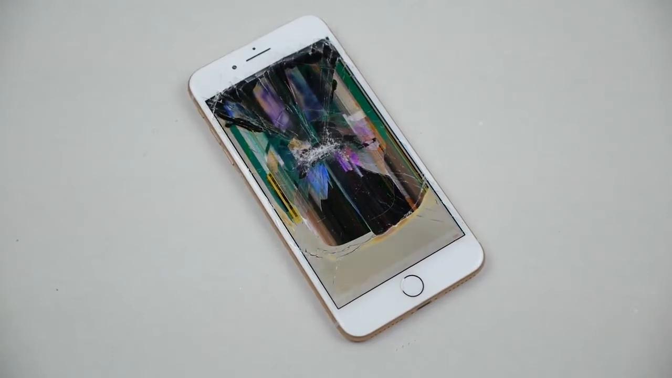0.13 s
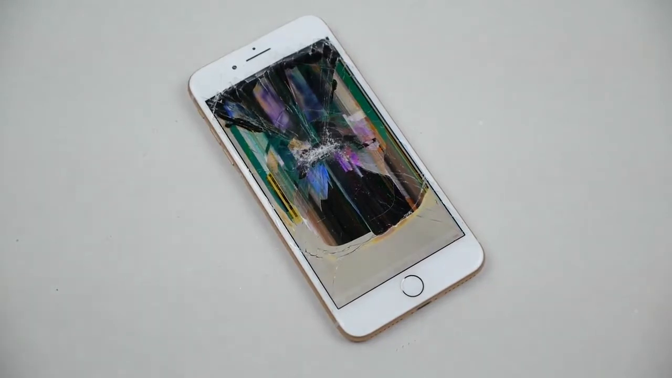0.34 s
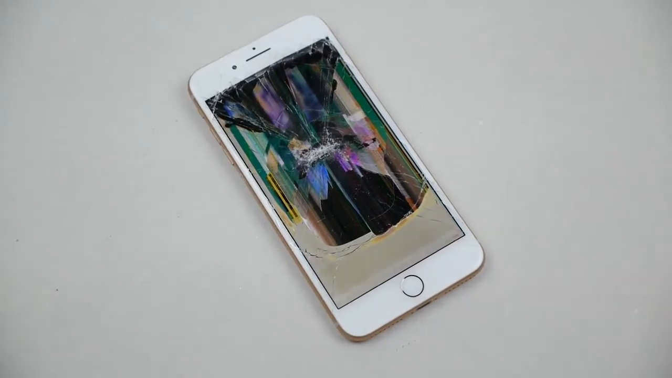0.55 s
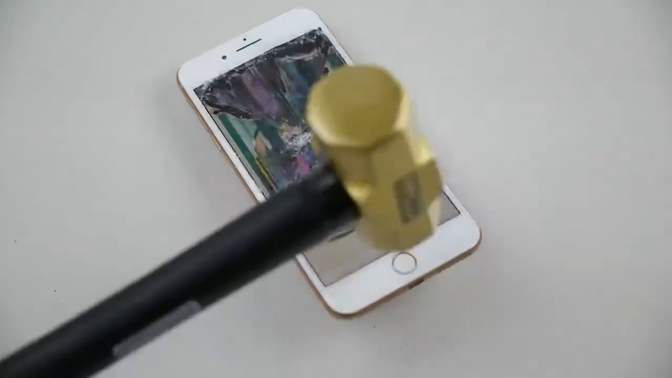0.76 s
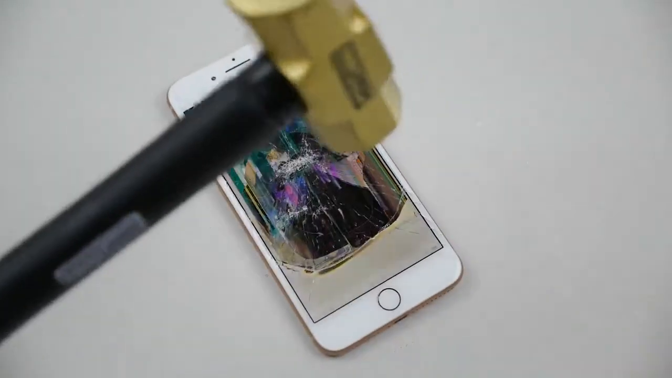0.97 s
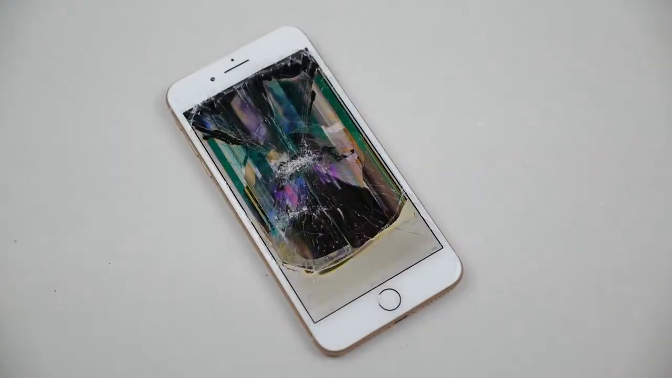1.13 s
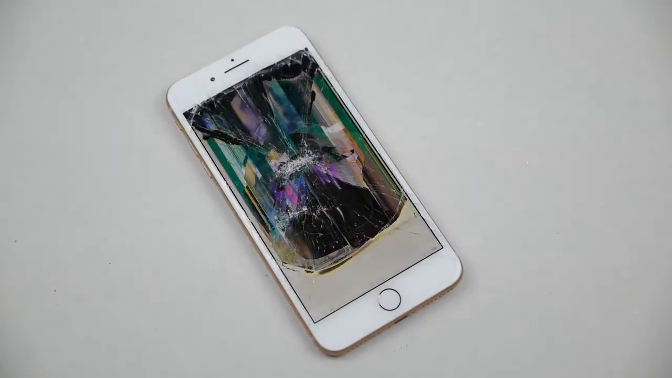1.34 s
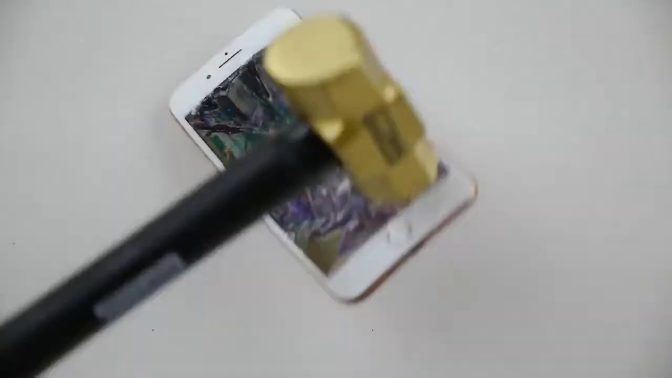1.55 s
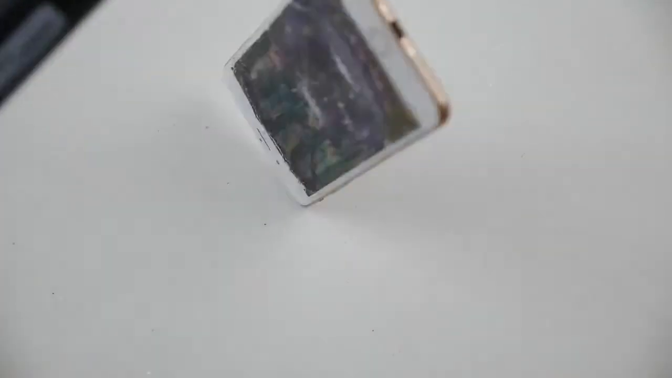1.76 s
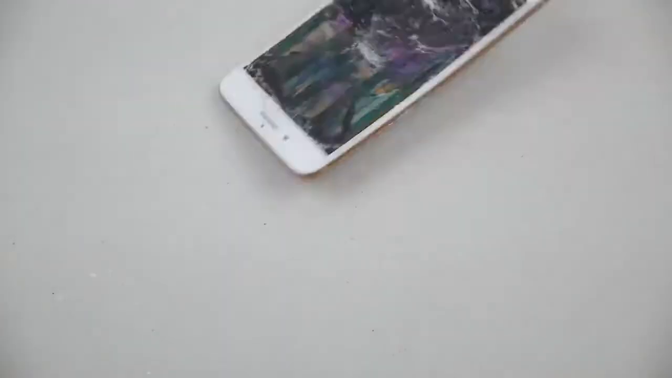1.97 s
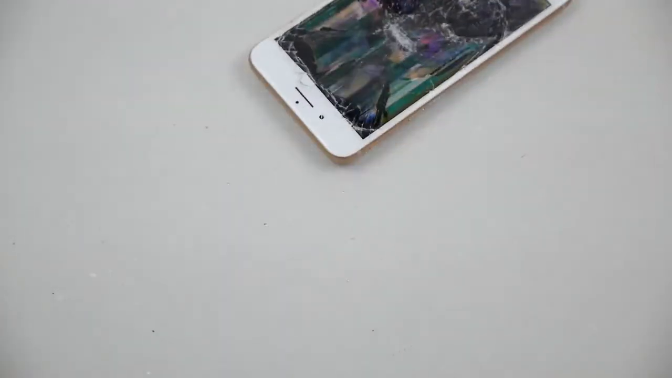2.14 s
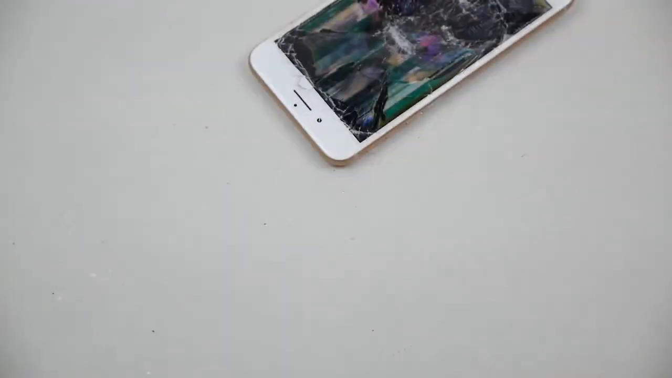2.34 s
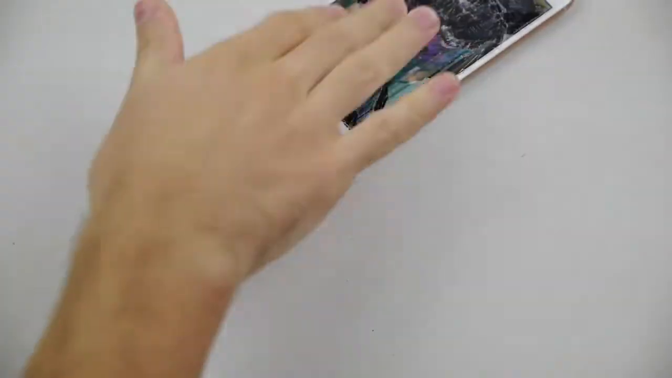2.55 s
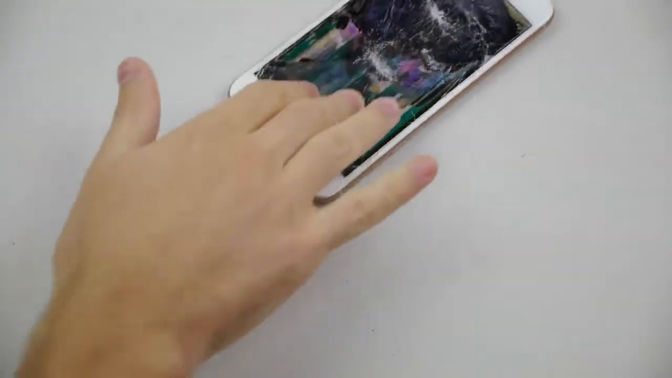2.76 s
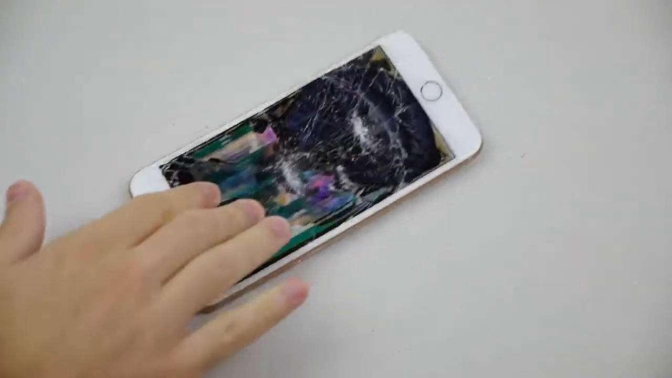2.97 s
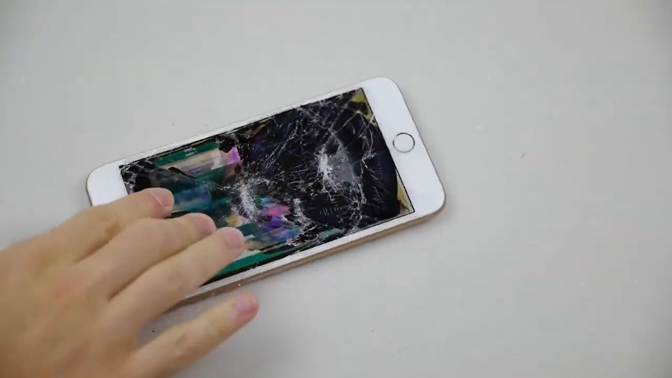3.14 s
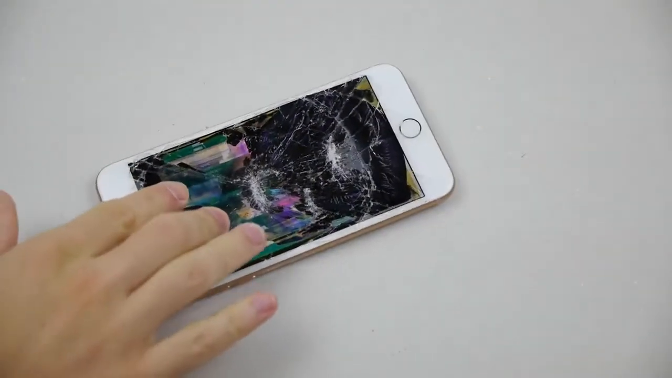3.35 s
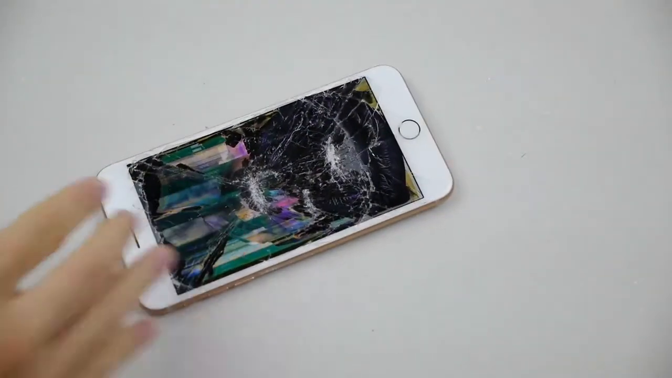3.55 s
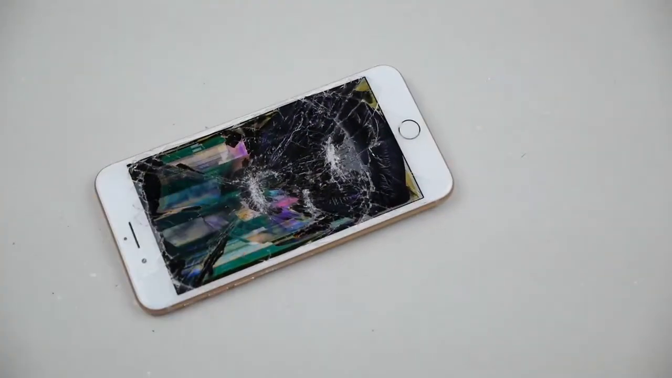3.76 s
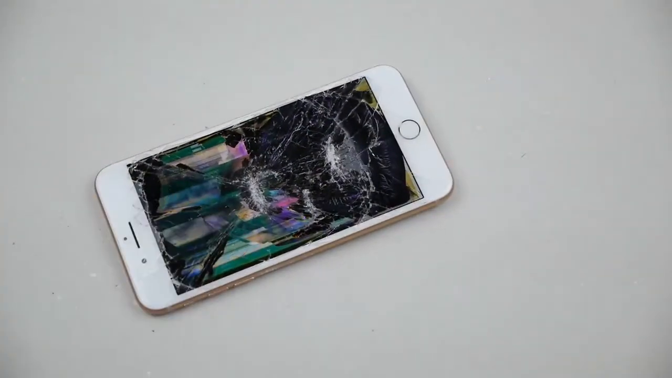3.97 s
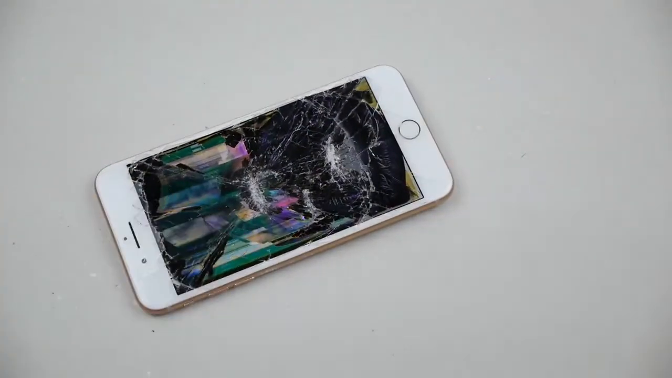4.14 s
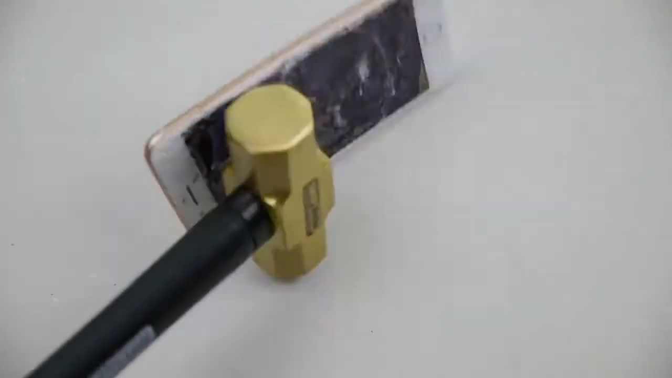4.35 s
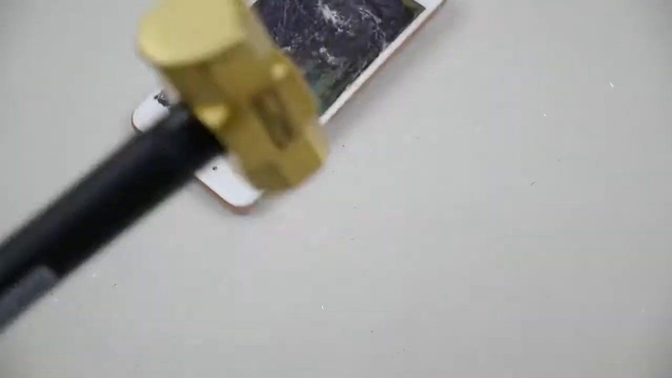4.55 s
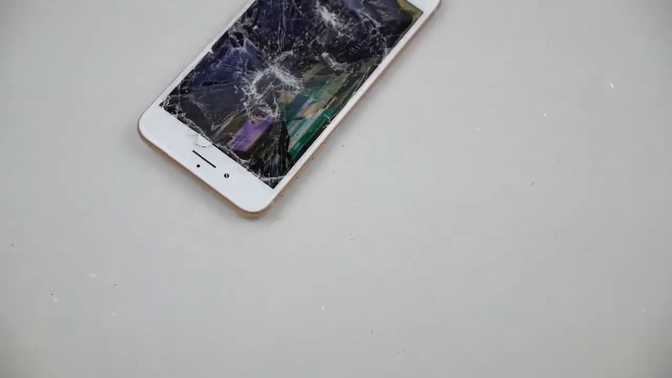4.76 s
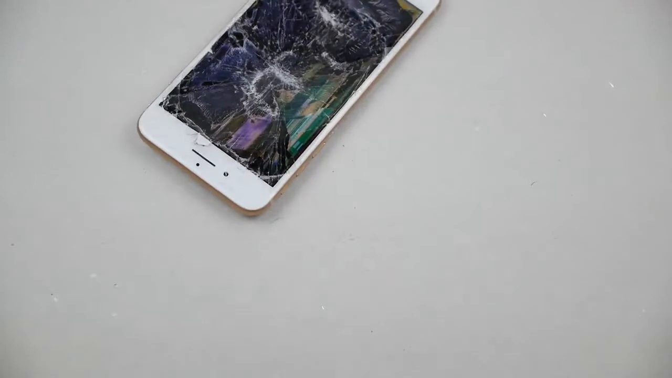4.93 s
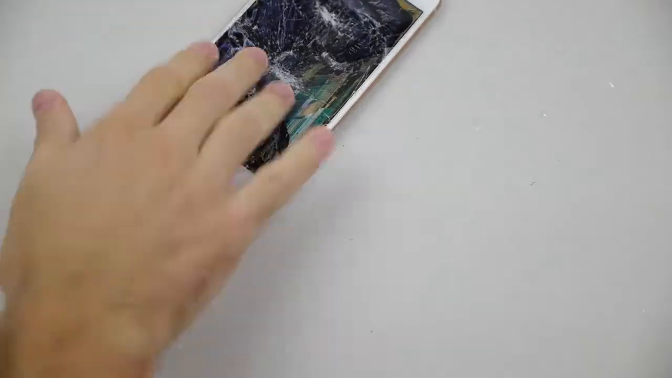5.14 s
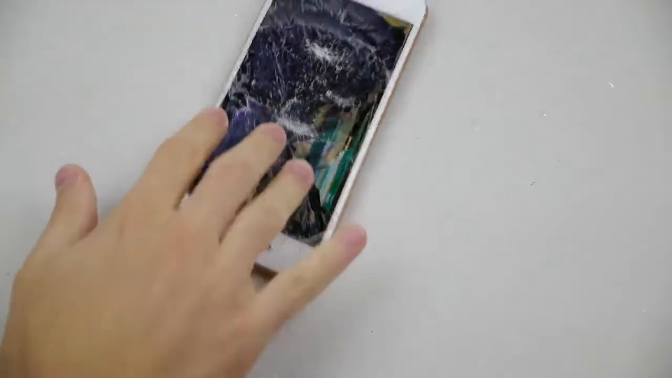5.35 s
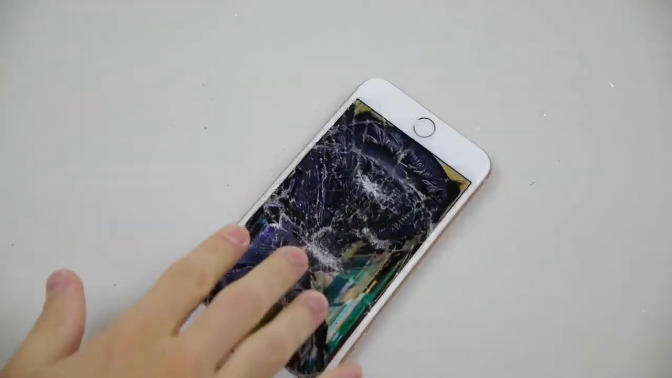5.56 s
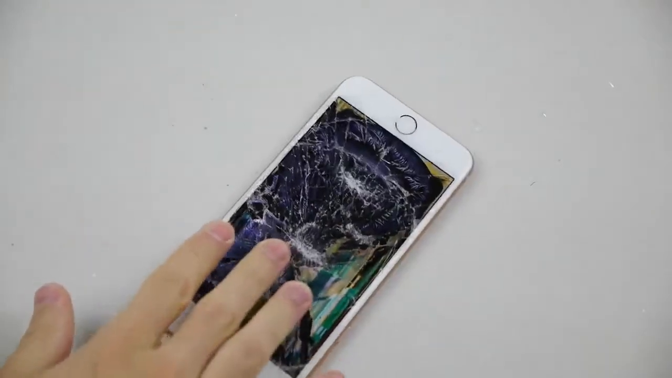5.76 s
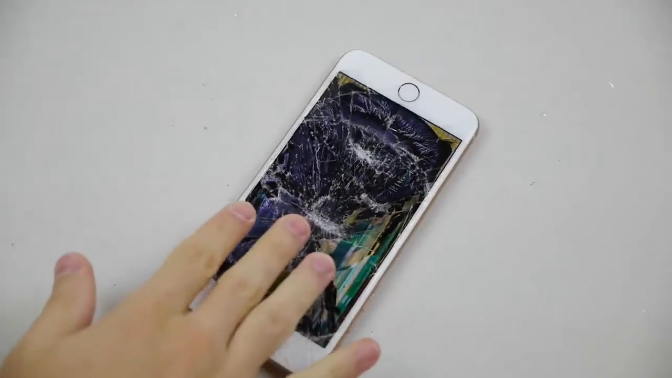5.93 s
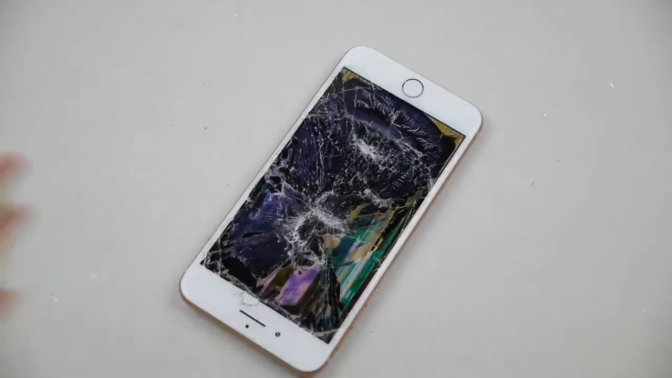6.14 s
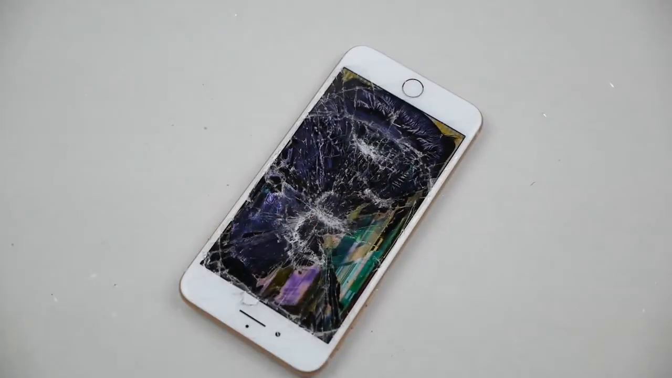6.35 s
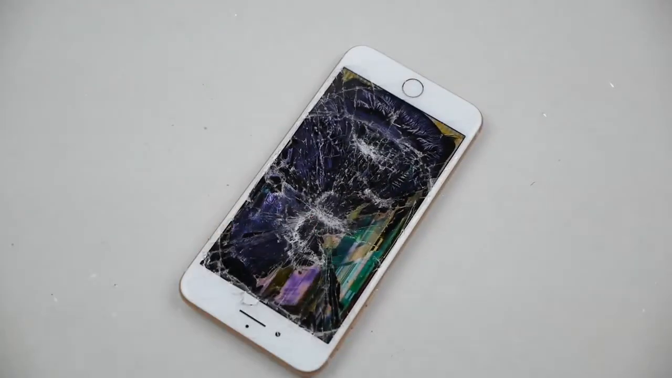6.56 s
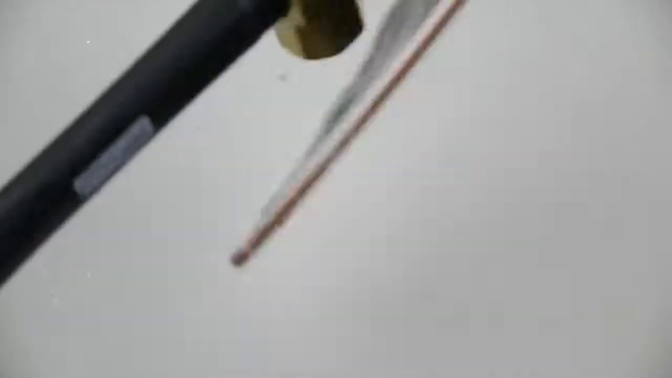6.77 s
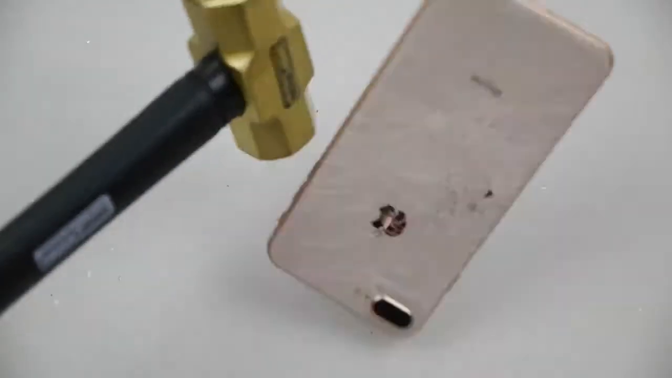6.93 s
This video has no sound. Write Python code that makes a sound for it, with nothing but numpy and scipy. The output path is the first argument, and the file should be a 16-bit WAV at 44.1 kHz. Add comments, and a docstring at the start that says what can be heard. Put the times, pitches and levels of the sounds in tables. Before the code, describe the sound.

Faint low hum and air fill a bare, live room, with a slight rustle, soft bump and tiny glass snap at the start. At 0.76 s a hammer hits a phone on a desk: clipped thud, case clack and splintering glass, then a rattly bounce near 0.9 and a few falling chips. The heaviest blow lands at 1.57; the tossed phone knocks down around 2.0 and rocks in quick weakening taps by 2.2. From 2.7 to 3.4 a hand drags it back, with dense sharp crackles, grit and dull rubbing. A third blow at 4.25 brings clatter and chips until 4.8. Dustier crunching drags run from 5.2 to 6.1, then near quiet. The fourth blow strikes at 6.71, with a last solid knock at 6.97. Every blow overloads the close stereo microphones; the level ducks, then the roughly half-second room ring swells up and fades.

```python
"""A rustle, a soft bump and a faint snap of glass, then the first of four hammer blows on a phone on a desk.
The phone jumps and clatters down, chips of glass scatter, and twice a hand drags it back, crunching.
Filtered clicks make the desk thud; bursts of tiny fractures make the case clack and the glass break.
A bare room answers with a noise tail and low standing waves; hum and air lie far behind.
Each blow overloads the recorder, whose limiter ducks and then lets the room's ring swell back."""
import sys
import numpy as np
from scipy import signal
from scipy.fft import rfft, irfft
from scipy.io import wavfile

SR = 44100
rng = np.random.default_rng(int(sys.argv[2]) if len(sys.argv) > 2 else 0)


def put_to_file(sound):
    """Save the sound as 16-bit audio at rate SR, in the file named by the first command-line argument."""
    columns = np.atleast_2d(sound).T  # one column per channel
    safe = np.clip(columns, -1, 1)
    whole_steps = np.round(safe * 32767)
    wavfile.write(sys.argv[1], SR, whole_steps.astype(np.int16))


N = 308700
TIME = np.arange(N) / SR  # seconds

# All levels are mixing levels ahead of the recorder; spectra set tone only, as their power is evened out.

# hammer blows: (time [s], force [dB], rebound re force [dB], shove of the heavy head re force [dB])
BLOWS = [(0.7625, 17.5, -16, -4), (1.5709, 25, -12, -6), (4.2485, 20.5, -5, 0), (6.7103, 20, -6, 1)]
# the face strikes, then crushes through:
# (delay [s], desk thud [dB], case clack [dB], glass [dB], crunch length [s]), levels re force
STRIKE_STAGES = [(0, 0, -6, -11, .004), (.0032, -7, -16, -12, .002)]
# the phone springs back against the hammer: same columns, levels re force plus rebound
REBOUND = (.0125, 0, -10, -8, .0018)
# the tossed or pushed phone knocks on the desk:
# (time [s], desk thud [dB], case clack [dB], glass [dB], crunch length [s])
KNOCKS = [ (0.909, -20, -12.5, -22, .014), (0.918, -6.5, -8.5, -3.5, .0037),
          (1.9655, -5.5, -23, -34, .0084), (1.999, -17, -31, -46, .0065), (2.0385, -11, -2.5, -3, .0022),
          (2.0465, -12, -1.5, -6.5, .0012), (2.1645, -8.5, -28, -17, .0033), (2.866, -18, -26, -22, .008),
          (2.893, -18, -23, -28, .004), (4.4, 4.5, 1.5, -10, .0055), (4.513, -10.5, -9.5, -19, .0061),
          (4.628, -5.5, -9.5, -21.5, .0022), (4.658, -11, -14, -36, .0017), (6.9747, 5, 1, -42, .0022)]
# first touch as the fallen phone rocks: (desk thud [dB], case clack [dB], glass [dB], crunch length [s])
ROCK_TOUCH = (-15, -27, -28, .003)
ROCK_START_S, ROCK_GAP_S, ROCK_GAP_SHRINK = 2.215, .029, .85  # shrink: each gap over the one before
ROCK_LOSS_DB, ROCK_BUMP_DB = 4, -3  # loss per touch; soft bump of the first touch
# soft bumps on the desk, from a hand or the phone falling flat: (time [s], level [dB])
BUMPS = [(0.056, -24), (1.972, -13), (4.67, -10), (4.79, -17), (5.205, -26), (5.362, -14), (5.46, -16),
         (5.892, -16)]

# desk top with the phone on it: (mode [Hz], level [dB], t60 [s])
DESK_MODES = [(78, -25, 0.12), (126.8, -14, 0.19), (168, -16.5, 0.13), (218, -13.5, .08),
              (277, -9.5, 0.046), (374.8, -3.5, 0.065), (452, -3.5, 0.039), (522, -8, 0.051),
              (670, -12.5, 0.02), (794, -16.5, 0.027)]
# the cracked screen: (resonance [Hz], width [Hz], level re direct [dB])
SCREEN_MODES = [(2370, 100, -5), (2940, 220, -4.5), (3240, 45, -6.5), (4320, 200, -6.5), (5680, 40, -5.5),
                (6450, 62, -7), (7450, 40, -9), (8370, 41, -8.5)]
# tone of the rattling case: (frequency [Hz], density [dB per Hz])
CLACK_SPECTRUM = [(30, -22), (150, -12), (500, 0), (900, 1.5), (1600, 4.5), (2500, 0), (4500, -5.5),
                  (7000, -31.5), (11000, -15), (16000, -42)]
# tone of breaking glass: (frequency [Hz], density [dB per Hz])
GLASS_SPECTRUM = [(100, -21.5), (800, -28.5), (1700, -8), (2500, -1), (5000, 1), (8000, -2), (12000, -4.5),
                  (16000, -13.5)]

# cracked glass snaps and ticks, under the hand or as it settles:
# (time [s], nominal peak [dB], crunch length [s])
SNAPS = [(0.098, -36.5, .009), (0.6527, -19.5, .0035), (2.729, -11, .0022), (2.75, -14.5, .018),
         (2.797, -13, .012), (2.9305, -1, .011), (2.9615, 3, .004), (3.014, -9, .007), (3.0375, 0, .006),
         (3.0605, 0, .009), (3.1047, 1, .0052), (3.139, -11, .016), (3.291, -11, .0058),
         (3.549, -19.5, .0037), (3.7394, -34, .004), (4.6175, -15, .006), (5.208, -10, .004),
         (5.261, -13, .003), (5.2674, -4, .013), (5.338, -10.5, .0095), (5.362, 1.5, .007),
         (5.3996, -3, .0057), (5.451, 1, .0038), (5.4816, -10, .013), (5.5011, -5, .013),
         (5.837, -17, .014), (5.9, -14, .005), (5.922, -10, .015), (6.012, -14, .009), (6.072, -24.5, .008),
         (6.6918, -24, .0034), (6.934, -11, .006)]
# loose chips land on the desk; the last row is a faint tick of the settling screen: (time [s], nominal peak
# [dB])
CHIPS = [(1.018, -20), (1.128, -25), (1.259, -31), (1.309, -30), (1.383, -37), (1.918, -26), (1.944, -26),
         (3.331, -22), (4.68, -24), (4.7036, -20.5), (4.74, -20), (4.758, -22), (4.804, -22.5),
         (5.068, -38), (6.3925, -38.5)]
CHIP_LENGTH_S = .006
CHIP_CLACK_DB, SNAP_CLACK_DB = -12, -7  # case re glass

# a hand drags the phone over glass crumbs, one curve per push:
# (time [s], grinding before trim [dB], desk rub before trim [dB])
DRAGS = [
    [(2.68, -68, -46), (2.74, -46, -36), (2.8, -32, -27), (2.87, -25, -13), (2.92, -27, -23),
     (2.955, -26, -50), (3.0, -34, -54), (3.15, -35, -38), (3.24, -49, -47), (3.34, -46, -45),
     (3.42, -70, -62)],
    [(5.19, -51, -52), (5.25, -54, -50), (5.29, -33, -39), (5.38, -33, -35), (5.47, -31, -26),
     (5.55, -37, -38), (5.6, -42, -42), (5.64, -33.5, -44), (5.71, -37, -49), (5.745, -50, -49)],
    [(5.745, -50, -49), (5.785, -36, -49), (5.83, -38, -48), (5.87, -32, -45), (5.895, -33, -30),
     (5.94, -34, -43), (6.0, -44, -53), (6.1, -70, -66)],
]
GRIT_DB, RUB_DB = -7, 1.5  # trims of the curves
DUST_DB = [-2, 2, 3.5]  # trim of the grinding curve per push: more dust as the screen crumbles
RUB_ROOM_DB = -6  # the rub is close and excites the room less
# tone of the phone's back on the desk: (frequency [Hz], density [dB per Hz])
RUB_SPECTRUM = [(30, -43), (70, -27), (120, 2), (200, -12), (370, 1), (540, 2), (1000, -18), (2000, -19),
                (5000, -29)]
# tone of sliding glass dust: (frequency [Hz], density [dB per Hz])
DUST_SPECTRUM = [(1000, -35), (3500, -15), (7000, -3), (11000, 0), (16000, -2)]

# faint rustles of handling between the blows: (time [s], level [dB])
RUSTLES = [(0.0, -57), (0.42, -59), (3.95, -63), (4.935, -54), (6.48, -62)]
RUSTLE_S = .03  # half-length
# tone of the rustles: (frequency [Hz], density [dB per Hz])
RUSTLE_SPECTRUM = [(100, -8), (400, 0), (1500, -4), (4000, -10), (9000, -7), (16000, -16)]

# standing waves of the room: (mode [Hz], level [dB])
ROOM_MODES = [(115, -26), (142, -31), (201, -25), (275, -24), (357, -22), (379, -25), (520, -26),
              (569, -32), (731, -35)]
# room decay: (frequency [Hz], t60 [s])
ROOM_T60 = [(60, .7), (300, 0.6), (1200, 0.71), (3000, 0.68), (6000, 0.53), (10000, .42), (16000, 0.1)]
# early reflected energy re direct: (frequency [Hz], level [dB])
EARLY_COLOUR = [(70, -13), (150, -5), (400, -3), (900, -7.5), (3000, -10.5), (12000, -15)]
# late reflected energy re direct: (frequency [Hz], level [dB])
LATE_COLOUR = [(60, -15.5), (120, -7), (220, -6), (400, -7.5), (700, -9), (1200, -2), (2200, -9),
               (5000, -8.5), (9000, -15), (16000, -10)]

# tone of the still air: (frequency [Hz], density [dB per Hz])
AIR_SPECTRUM = [(15, -46), (25, -10), (62, -5), (127, -11), (170, -13), (249, -5), (285, -13.5),
                (516, -15.5), (2000, -24.5), (8360, -26), (16000, -32.5)]
AIR_DB = -59.5
HUM_HZ, HUM_DB, HUM_WAVER_HZ, HUM_WAVER_DB = 123, -68, 4, 3

# side re mid at the microphone pair: (frequency [Hz], level [dB])
WIDTH = [(30, -14), (100, -26), (300, -22), (700, -16), (1400, -9.5), (2800, -5), (6000, -2.2),
         (16000, -1.8)]
LOW_CUT_HZ, CUTOFF_HZ = 70, 16000  # the microphone's bass roll-off; top cut


def hammering():
    """Each blow is a strike that crushes through, and a rebound of its own strength."""
    rows = []
    for s, force_db, rebound_db, _ in BLOWS:
        stages = [(stage, force_db) for stage in STRIKE_STAGES]
        stages.append((REBOUND, force_db + rebound_db))
        for contact, db in stages:
            rows.append(np.array(contact) + [s, db, db, db, 0])
    return rows


def rocking(count=4):
    """The phone settles in ever quicker, weaker touches: (time [s], level below the first [dB])."""
    touch = np.arange(count)
    gaps = ROCK_GAP_S * ROCK_GAP_SHRINK ** touch
    times = ROCK_START_S + np.cumsum(gaps) - gaps
    return list(zip(times, ROCK_LOSS_DB * touch))


def contacts(crack_hz=9500, glancing_swell_s=0.011):
    """Every contact pushes the desk, rattles the case and breaks some glass."""
    push, case, glass = np.zeros(N), np.zeros((2, N)), np.zeros((2, N))
    touches = [np.array([s, *ROCK_TOUCH]) - [0, loss, loss, loss, 0] for s, loss in rocking()]
    for s, thud_db, clack_db, glass_db, length_s in hammering() + list(KNOCKS) + touches:
        # light, glancing contacts grind before they bite
        swell_s = np.interp(max(thud_db, glass_db), [-12, 2], [glancing_swell_s, 0])
        add(push, s, from_db([thud_db]))
        add(case, s, from_db(clack_db) * crunch(length_s, swell_s))
        add(glass, s, from_db(glass_db) * crunch(length_s, swell_s))
    # the whole pane cracks lower than its small chips do
    glass = butter_filter(glass, 2, min(crack_hz, SR / 2.5), "low")
    splinter_case, splinter_glass = splintering()
    return push, case + splinter_case, glass + splinter_glass


def desk(push, contact_hz=760, soft_hz=140, lowest_hz=90):
    """Hard contacts drive all modes of the desk and the room's standing waves, soft ones mainly the lowest."""
    soft = np.zeros(N)
    shoves = [(s, force_db + shove_db) for s, force_db, _, shove_db in BLOWS]
    rocks = [(s, ROCK_BUMP_DB - loss) for s, loss in rocking()]
    for s, db in list(BUMPS) + shoves + rocks:
        add(soft, s, from_db([db]))
    soft = butter_filter(soft, 2, soft_hz, "low")
    force = butter_filter(push + soft, 2, [lowest_hz, contact_hz], "band")
    standing = [(hz, db, at_hz(ROOM_T60, hz)) for hz, db in ROOM_MODES]
    return ring(force, DESK_MODES), ring(force, standing)


def screen(fractures, radiated_db=3.0):
    """Fractures sound bright and set the glass plate ringing briefly."""
    direct = stereo(fractures, GLASS_SPECTRUM)
    rings = sum(from_db(db) * resonate(direct, hz, width_hz) for hz, width_hz, db in SCREEN_MODES)
    return from_db(radiated_db) * (direct + rings)


def splintering(swell_s=.0025, crest_db=13.0, splinter_low_hz=550):
    """Snaps of cracked glass and landing chips ring as splinters and rattle the case lightly."""
    case, glass = np.zeros((2, N)), np.zeros((2, N))
    splinters = [(*row, SNAP_CLACK_DB) for row in SNAPS]
    splinters += [(*row, CHIP_LENGTH_S, CHIP_CLACK_DB) for row in CHIPS]
    # splinters cannot move the case at low pitch
    too_light = signal.butter(2, splinter_low_hz, "high", fs=SR)
    for s, peak_db, length_s, clack_db in splinters:
        snap = from_db(peak_db - crest_db) * crunch(length_s, swell_s)  # nominal peak to burst level
        add(glass, s, shard(snap))
        add(case, s, from_db(clack_db) * signal.lfilter(*too_light, snap))
    return case, glass


def shard(x, ring_db=4.0, width_hz=60, count=6):
    """Each splinter rings at a few pitches of its own, with its energy unchanged."""
    pitches = np.exp(rng.uniform(np.log(2200), np.log(14000), count))
    rings = sum(resonate(x, hz, width_hz) for hz in pitches)
    y = x + from_db(ring_db) * rings
    return y * np.sqrt(np.sum(x ** 2) / np.sum(y ** 2))


def dragging():
    """Crumbs grind under the sliding phone while its back rubs the desk."""
    grit = from_db(GRIT_DB) * sum(along(rows, 1) for rows in DRAGS)
    rub = from_db(RUB_DB) * sum(along(rows, 2) for rows in DRAGS)
    crumbs = grains(N, spread_db=3.5, clump_db=4.5)
    slips = grains(N, spread_db=2.0, clump_db=3.0)
    return grit * crumbs, rub * slips / 2


def gliding():
    """Dust hisses in little slips as the phone slides."""
    slips = grains(N, spread_db=5.0, clump_db=5.5, count=16)
    level = sum(from_db(db) * along(rows, 1) for rows, db in zip(DRAGS, DUST_DB))
    return stereo(level * slips, DUST_SPECTRUM)


def rustling():
    """Each rustle of handling is grainy noise that swells and fades."""
    level = sum(from_db(db) * np.exp(-((TIME - s) / RUSTLE_S) ** 2) for s, db in RUSTLES)
    return stereo(level * grains(N, spread_db=2.5, clump_db=2.5), RUSTLE_SPECTRUM)


def room(x, early_t60=0.12, build_t60=0.017, count=16):
    """Each band's energy feeds a diffuse field: quick reflections off the desk, then the walls' long ring."""
    edges = np.geomspace(50, CUTOFF_HZ, count + 1)
    white, mono, out = rng.standard_normal((2, N)), x.mean(axis=0), 0
    carriers = [white, np.roll(white, N // 2, axis=1)]  # neighbouring bands get unrelated noise
    for k, (low, high) in enumerate(zip(edges, edges[1:])):
        hz = np.sqrt(low * high)
        power = linger(butter_filter(mono, 2, [low, high], "band") ** 2, build_t60)
        early = from_db(at_hz(EARLY_COLOUR, hz)) ** 2 * linger(power, early_t60)
        late = from_db(at_hz(LATE_COLOUR, hz)) ** 2 * linger(power, at_hz(ROOM_T60, hz))
        noise = butter_filter(carriers[k % 2], 2, [low, high], "band")
        mid, side = noise / noise.std() * np.sqrt(early + late)
        side = side * from_db(at_hz(WIDTH, hz))
        out = out + np.array([mid + side, mid - side])
    return out


def linger(power, t60):
    """Stored energy leaks away by 60 dB in t60 seconds."""
    r = np.exp(-2 * np.log(1000) / (t60 * SR))
    return signal.lfilter([1 - r], [1, -r], power + 1e-18)


def hum(count=12):
    """A faint hum wavers slowly in pitch and level, between random points."""
    knots = np.linspace(0, TIME[-1], count)
    pitch = np.interp(TIME, knots, rng.standard_normal(count))
    level = np.interp(TIME, knots, rng.standard_normal(count))
    phase = 2 * np.pi * np.cumsum(HUM_HZ + HUM_WAVER_HZ * pitch) / SR
    return from_db(HUM_DB + HUM_WAVER_DB * level) * np.sqrt(2) * np.sin(phase)


def still_air():
    """Steady noise, heaviest in the bass, fills the background."""
    return from_db(AIR_DB) * stereo(rng.standard_normal((2, N)), AIR_SPECTRUM)


def crunch(length_s, swell_s=0., size=3000):
    """A break and a dying run of smaller fractures; under slow pressure the run swells first."""
    t = TIME[:size]
    length_s = max(length_s, .0005)
    swell = 1 - np.exp(-(t / max(swell_s, .00002)) ** 2)
    x = grains(size, spread_db=4.0, clump_db=2.0) * np.exp(-t / length_s) * swell
    # energy follows the length, whatever the swell
    return x * np.sqrt(length_s * SR / 2 / np.sum(x ** 2, axis=1, keepdims=True))


def grains(length, spread_db, clump_db, size=24, count=10):
    """Noise of half-millisecond fractures of uneven strength, which come in clumps; rms 1."""
    cells = length // size + 1
    knots = np.clip(rng.standard_normal(cells), -1.7, 1.7)
    clumps = np.interp(np.arange(cells) / count, np.arange(cells), knots)  # count grains per knot
    uneven = np.clip(rng.standard_normal(cells), -2, 2)
    strength = from_db(spread_db * uneven + clump_db * clumps)
    x = rng.standard_normal((2, length)) * np.repeat(strength, size)[:length]
    return x / np.sqrt(np.mean(x ** 2))


def ring(x, modes):
    """A unit click sets each mode ringing as a dying tone."""
    out = 0
    for hz, db, t60 in modes:
        r = np.exp(-np.log(1000) / (t60 * SR))
        w = 2 * np.pi * hz / SR
        tone = signal.lfilter([.5, 0, -.5], [1, -2 * r * np.cos(w), r * r], x + 1e-18)
        out = out + from_db(db) * tone
    return out


def resonate(x, hz, width_hz):
    """One narrow resonance, unit gain at its peak."""
    return signal.lfilter(*signal.iirpeak(hz, hz / width_hz, fs=SR), x)


def butter_filter(x, order, hz, kind):
    """Causal Butterworth filter; the tiny offset keeps silence from slowing it."""
    return signal.sosfilt(signal.butter(order, hz, kind, fs=SR, output="sos"), x + 1e-18)


def stereo(pair, spectrum, keep_power=True):
    """Two unrelated signals become mid and side: one in the bass, apart in the treble."""
    mid, side = (colour(x, spectrum, keep_power) for x in pair)
    side = colour(side, WIDTH, keep_power=False)
    return np.array([mid + side, mid - side])


def colour(x, spectrum, keep_power=True, size=8192):
    """Causal (minimum-phase) filter that follows a spectrum."""
    gain = from_db(at_hz(spectrum, np.fft.rfftfreq(size, 1 / SR)))
    if keep_power:
        gain = gain / np.sqrt(np.mean(gain ** 2))
    # folding the cepstrum onto positive time makes the response minimum-phase
    cepstrum = irfft(np.log(gain)) * (1 + np.sign(np.fft.fftfreq(size)))
    response = irfft(np.exp(rfft(cepstrum)))[:size // 2]
    return signal.oaconvolve(x, response)[:len(x)]


def along(rows, column):
    """Gain over time from a dB column of a curve; silent outside it."""
    rows = np.array(rows)
    return from_db(np.interp(TIME, rows[:, 0], rows[:, column], left=-np.inf, right=-np.inf))


def at_hz(points, hz):
    """Read a table along a log-frequency axis."""
    f, value = np.transpose(points)
    return np.interp(np.log(np.maximum(hz, 1)), np.log(f), value)


def from_db(db):
    """Decibels to gain."""
    return 10 ** (np.asarray(db) / 20)


def add(track, s, sound):
    """Mix a sound into a track at a time in seconds."""
    at = round(s * SR)
    track[..., at:at + sound.shape[-1]] += sound[..., :N - at]


def scene():
    """Desk, case and glass before the microphone pair, the room around them, over still air."""
    push, case, glass = contacts()
    grit, rub = dragging()
    thud, boom = desk(push)
    direct = thud + stereo(case, CLACK_SPECTRUM) + screen(glass + grit) + gliding() + rustling()
    rub = stereo(rub, RUB_SPECTRUM)
    reflected = room(direct + from_db(RUB_ROOM_DB) * rub)
    return direct + rub + reflected + boom + still_air() + hum()


def release(over_db, db_per_s):
    """Hold each peak and let it fall at a steady rate."""
    return np.maximum.accumulate(over_db + db_per_s * TIME) - db_per_s * TIME


def limiter(x, input_db=2.5, threshold_db=6.0, release_db_per_s=55.0,
            slow_depth_db=4.5, slow_db_per_s=0.7, attack_s=0.0018):
    """The gain drops within milliseconds of an overload and climbs back; the last few dB take seconds."""
    x = from_db(input_db) * x
    level_db = 20 * np.log10(np.abs(x).max(axis=0) + 1e-9)
    over = np.maximum(level_db - threshold_db, 0)
    fast = release(over, release_db_per_s)
    slow = release(np.minimum(over, slow_depth_db), slow_db_per_s)
    r = np.exp(-1 / (attack_s * SR))
    reduction_db = signal.lfilter([1 - r], [1, -r], np.maximum(fast, slow))
    return x * from_db(-reduction_db)


def record(dry):
    """Bass roll-off, limiter, clipping of the first cycles that outrun it, and the top cut."""
    picked_up = butter_filter(dry, 2, LOW_CUT_HZ, "high")
    clipped = np.clip(limiter(picked_up), -.9, .9)
    return signal.sosfilt(signal.ellip(10, .1, 80, CUTOFF_HZ, fs=SR, output="sos"), clipped)


dry = scene()
out = record(dry)
put_to_file(out)
```